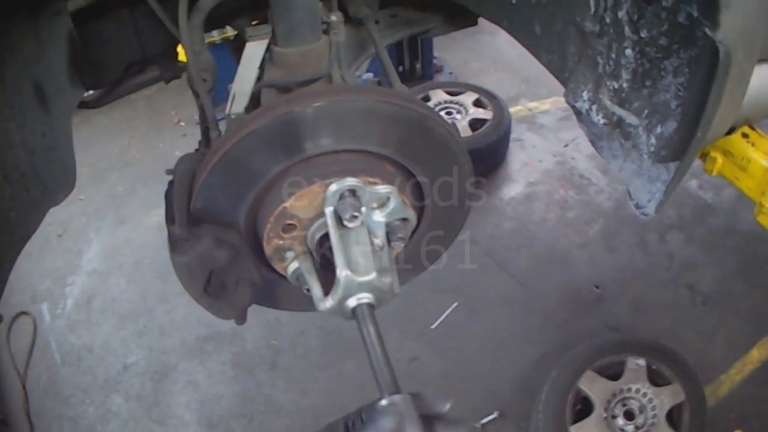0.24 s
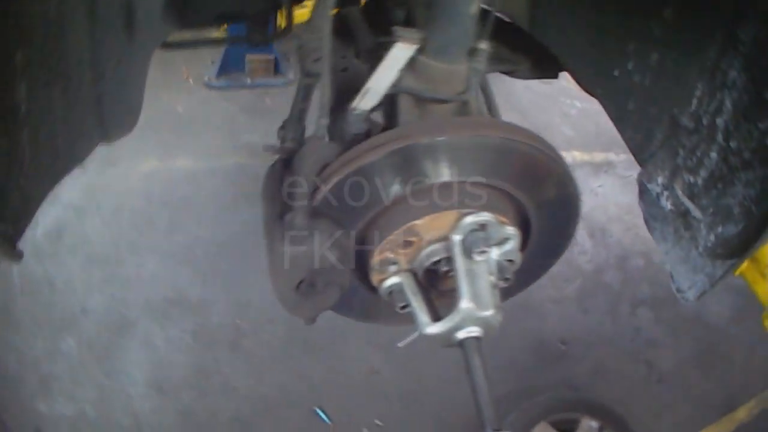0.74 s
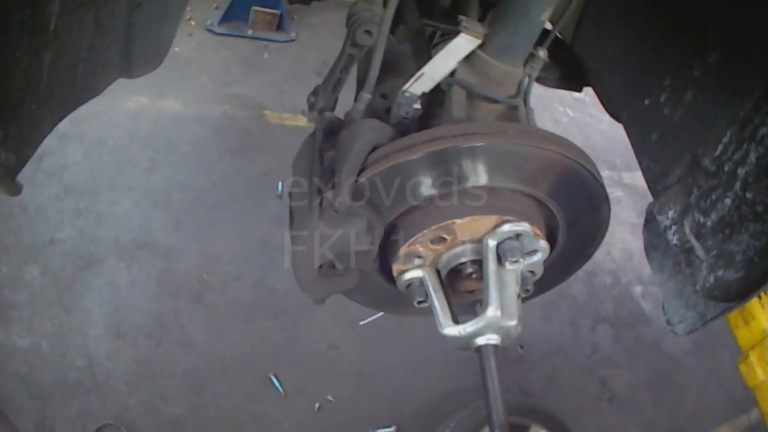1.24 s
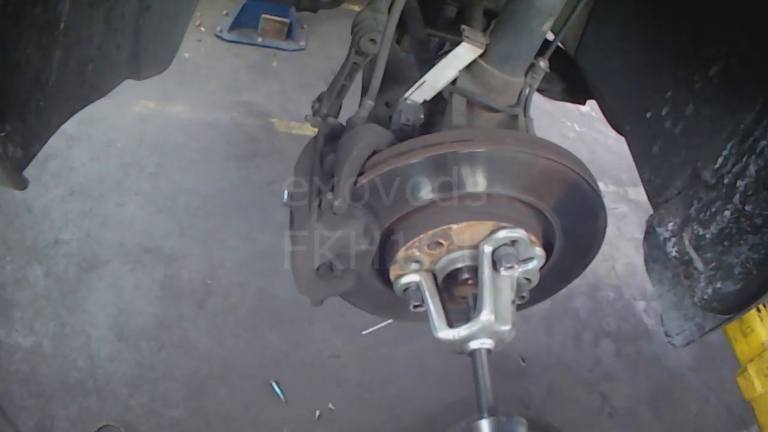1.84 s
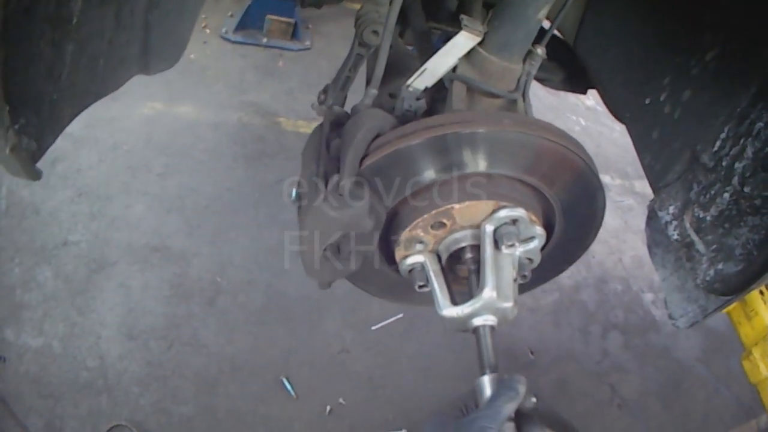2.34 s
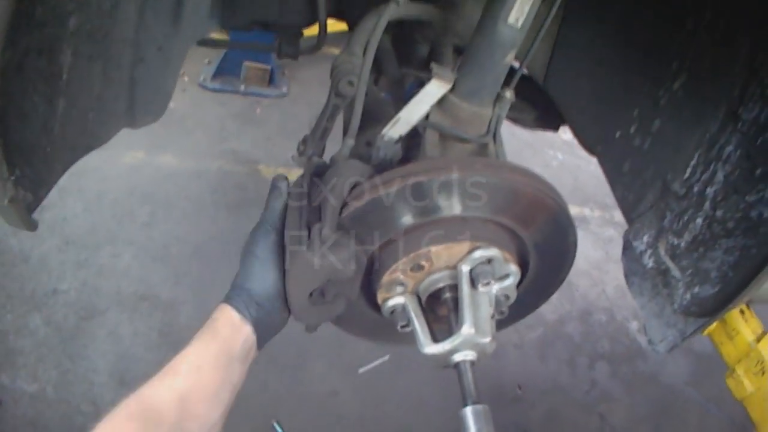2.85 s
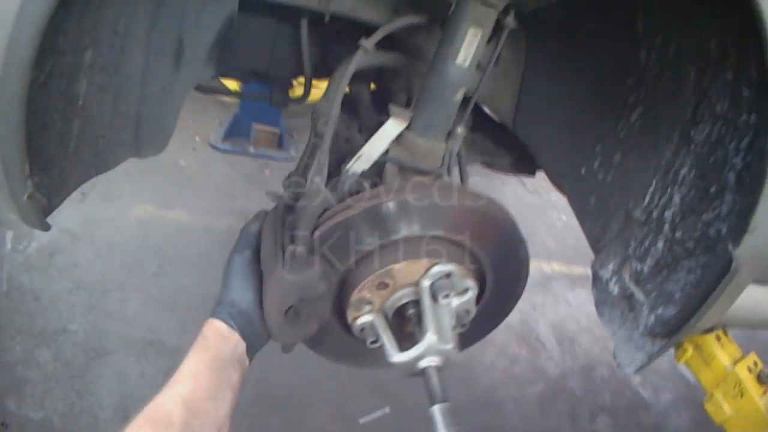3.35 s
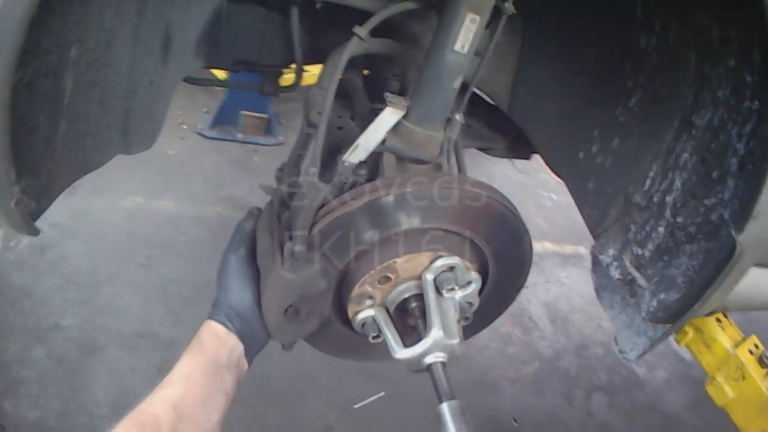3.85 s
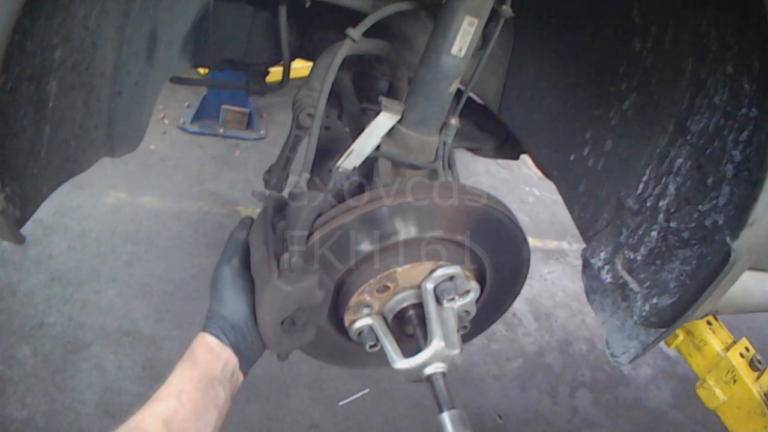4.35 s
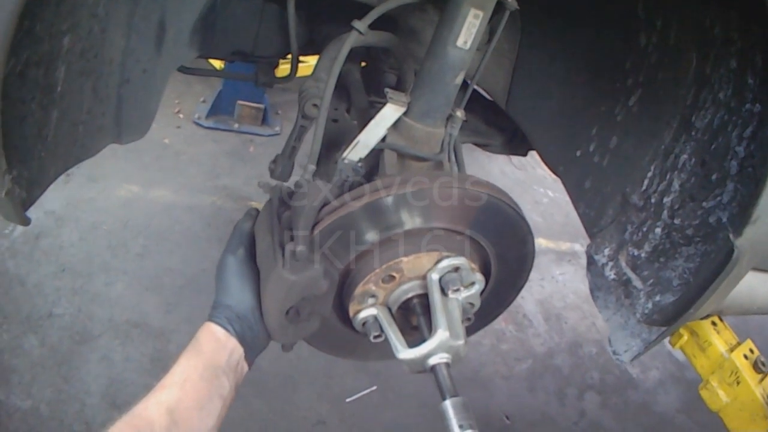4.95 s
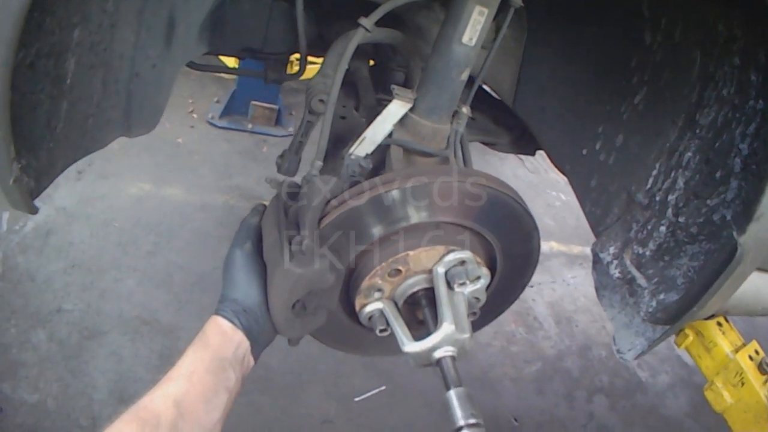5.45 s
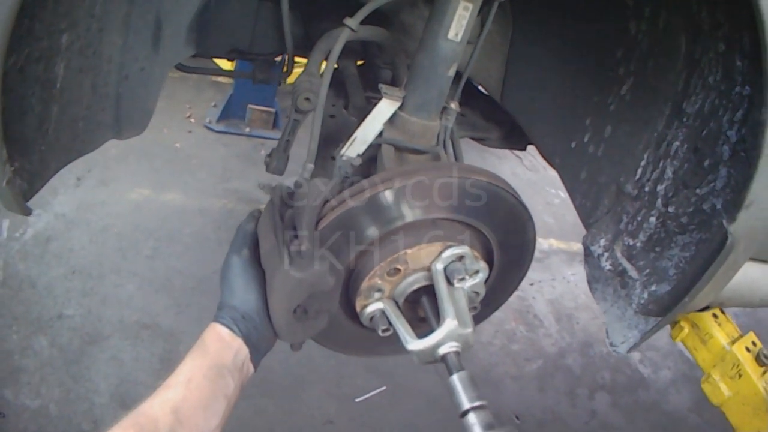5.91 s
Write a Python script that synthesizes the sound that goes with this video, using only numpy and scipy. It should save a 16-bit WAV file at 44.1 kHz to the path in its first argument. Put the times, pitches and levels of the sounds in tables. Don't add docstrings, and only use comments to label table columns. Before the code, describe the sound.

A close pneumatic wrench on a car hub: first a fading pressure thump and deep rumble, then four quick trigger blips, each a nasal whine with rattling socket clicks and puffs of air. About a second of quiet shop noise follows. A long, dense metallic hammering with rasping exhaust comes next, quickening at the end before the rotor races free. Short room echo surrounds it.

```python
import sys
import numpy as np
from scipy import signal
from scipy.fft import rfft, irfft, next_fast_len
from scipy.io import wavfile
from scipy.ndimage import uniform_filter1d

SR = 44100
rng = np.random.default_rng(int(sys.argv[2]) if len(sys.argv) > 2 else 0)


def log_audio(samples):
    frames = np.atleast_2d(samples).T
    limited = np.clip(frames, -1, 1)
    pcm = np.round(limited * 32767).astype(np.int16)
    wavfile.write(sys.argv[1], SR, pcm)


def undo_db(level):
    steps = np.asarray(level, float) / 20
    return 10 ** steps


N = 272538
TOP_HZ = 12780


def unit(x):
    return x / np.sqrt(np.mean(x ** 2) + 1e-20)


def along(points, hz):
    f, v = np.transpose(points)
    return np.interp(np.log(hz + 1), np.log(f + 1), v)


def curves(rows):
    s, *columns = np.transpose(rows)
    return [np.interp(np.arange(N) / SR, s, column) for column in columns]


def filtered(x, response):
    size = next_fast_len(len(x) + SR // 2)
    return irfft(rfft(x, size) * response(np.fft.rfftfreq(size, 1 / SR)), size)[:len(x)]


def resonate(x, modes):
    def gain(f):
        total = 0
        for k, (centre, width, db) in enumerate(modes):
            damping = 1j * f * width
            total = total + (-1) ** k * undo_db(db) * damping / (centre * centre - f * f + damping)
        return total

    power = np.mean(np.abs(gain(np.linspace(0, SR / 2, 2000))) ** 2)
    return filtered(x, gain) / np.sqrt(power)


def coloured(spectrum, size):
    white = rng.standard_normal(size + 2 * SR)
    return filtered(white, lambda hz: undo_db(along(spectrum, hz)))[SR:-SR] * np.sqrt(SR / 2)


def squeeze(x, top):
    return x / (1 + np.abs(x / top) ** 3) ** (1 / 3)


# (frequency [Hz], density [dB per Hz])
RUMBLE_SPECTRUM = [(1, -32), (3, -15.5), (7, -35), (14, -32), (28, -39.5), (100, -50), (400, -63),
                   (1000, -72.5), (4000, -86.5), (10000, -99), (14300, -104), (15200, -125)]
# (size, duration [s])
PRESSURE_SURGE = (.4, .03)


def rumble_pair():
    lead = 22
    rumble = coloured(RUMBLE_SPECTRUM, N + lead)
    swell = uniform_filter1d(rumble, SR // 40)
    rumble += squeeze(swell, top=.42) - swell
    size, duration = PRESSURE_SURGE
    rumble += size * np.exp(-(np.arange(N + lead) / SR / duration) ** 2)
    return np.array([rumble[lead:], rumble[:N]])


# (frequency [Hz], density [dB per Hz])
SHOP_SPECTRUM = [(200, -69), (700, -74), (1500, -82.5), (2800, -89), (3800, -93.5), (5500, -99),
                 (7000, -102), (9000, -106), (12000, -109), (14500, -114), (15400, -125)]
# (time [s], level [dB])
SHOP_DRIFT = [
    (0, 0.5),
    (1.1, 1.5),
    (2.6, 1.5),
    (3.7, 1),
]


def shop_air():
    return undo_db(curves(SHOP_DRIFT)[0]) * coloured(SHOP_SPECTRUM, N)


# (frequency [Hz], t60 [s])
GARAGE_T60 = [(500, 0.74), (2000, 0.49), (5000, 0.36), (11000, 0.29)]


def garage(x):
    out, step = np.zeros(N + 2 * SR), SR // 4
    for start in range(0, N, step):
        hz, t, z = signal.stft(rng.standard_normal(SR // 2), SR, nperseg=256)
        decay = undo_db(-60 * t / along(GARAGE_T60, hz)[:, None])
        tail = signal.istft(z * decay, SR, nperseg=256)[1]
        echo = signal.fftconvolve(x[start:start + step], tail / np.linalg.norm(tail))
        out[start + 400:][:len(echo)] += echo
    return out[:N]


# (pressed [s], released [s], vane rate aimed at on release [Hz], air [dB], whine fade after release [dB/s])
PULLS = [
    (1.211, 1.298, 445, -32.5, 24),
    (1.507, 1.572, 430, -33.5, 47),
    (1.954, 2.038, 469.8, -32.5, 49),
    (2.342, 2.452, 539.6, -34, 500),
    (3.725, 6.115, 548, -34, 11),
]
# (time [s], vane rate [Hz])
LONG_RUN_SPEED = [
    (3.725, 170),
    (3.75, 200),
    (4.1, 230),
    (5.4, 280),
    (5.7, 280),
    (5.8, 312),
    (6.0, 490),
    (6.07, 528),
    (6.115, 548),
]
# (vane rate [Hz], level [dB])
WHINE_BY_SPEED = [(150, -72), (230, -39.5), (280, -34.5), (320, -29), (400, -27.5), (530, -24)]
# (time [s], level [dB])
AIR_SPITS = [
    (1.191, -37),
    (1.633, -28),
    (1.768, -48),
    (2.1, -33),
    (2.238, -46),
    (3.738, -36),
]


def trigger():
    start_hz, free_hz, rest_hz, coast_s = 205.05, 490, 110, .135
    t = np.arange(N) / SR
    table = np.array(PULLS)
    pull = (np.searchsorted(table[:, 0], t) - 1).clip(0)
    on, off, top_hz, air_db, fade = table[pull].T
    driven = np.minimum(t, off)
    progress = ((driven - on) / (off - on)).clip(0)
    spin = np.minimum(start_hz + (top_hz - start_hz) * progress, free_hz)
    short = pull < len(table) - 1
    spin = np.where(short, spin, np.interp(driven, *np.transpose(LONG_RUN_SPEED)))
    after = t - driven
    hz = uniform_filter1d(rest_hz + (spin - rest_hz) * np.exp(-after / coast_s), size=500)
    whine_db = along(WHINE_BY_SPEED, hz) - fade * after - 99 * (t < on)
    whine_db = whine_db - short * (after == 0)
    hiss, roar = np.zeros((2, N))
    for pressed, released, _, db, brake in PULLS:
        held = np.round(t.clip(pressed + .02, released) * SR).astype(int)
        octaves = np.log2(hz[held] / 320)
        shut_db = 1800 * (pressed - t).clip(0)
        emptying = (t - released).clip(0)
        hiss += undo_db(db + 5 * octaves - shut_db - (454 + brake) * emptying)
        roar += undo_db(db + 9.5 - 2.5 * octaves - shut_db - (68 + 0.45 * brake) * emptying)
    for s, db in AIR_SPITS:
        hiss += undo_db(db) * np.exp(-((t - s) / 0.0029) ** 2)
    return hz, uniform_filter1d(whine_db, size=600), hiss, roar


# (time [s], share of speed)
ROTOR_STALL = [
    (3.6, .008),
    (3.7, .045),
    (5.5, .04),
    (5.7, .012),
    (6.0, .008),
]
# (frequency [Hz], level [dB])
VANE_OVERTONES = [(150, -10), (250, -3), (320, 2), (520, 1), (750, -1), (1050, -4), (1300, 2), (1600, 4),
                  (1900, -3), (2300, -15), (3000, -30)]
# (frequency [Hz], width [Hz], level [dB])
EXHAUST_MODES = [(3450, 760, -3.5), (3940, 140, 4.5), (4560, 490, -6), (5530, 630, -0.5),
                 (8050, 32000, -10.5), (11800, 5100, -23.5)]
# (frequency [Hz], width [Hz], level [dB])
HOUSING_MODES = [(460, 346, 4.5), (1180, 350, 5.5), (1630, 675, 4), (2344, 340, -7)]


def motor():
    hz, whine_db, hiss_gain, roar_gain = trigger()
    wander = unit(uniform_filter1d(rng.standard_normal(N), 900))
    turn = 2 * np.pi * np.cumsum(hz * (1 + curves(ROTOR_STALL)[0] * wander)) / SR
    speeding = uniform_filter1d(np.gradient(hz) * SR / 1000, 600).clip(-1, 3)
    whine = np.zeros(N)
    for k in range(1, 11):
        flutter_db = (2.5 if k > 1 else 1) * unit(uniform_filter1d(rng.standard_normal(N), 700))
        sharp_db = -1.8 * speeding * (k > 2)
        level_db = along(VANE_OVERTONES, k * hz) + flutter_db + sharp_db
        whine += undo_db(level_db) * np.sin(k * turn + k * k)
    puff = unit(2.6 + np.cos(turn))
    hiss = undo_db(6.5) * hiss_gain * resonate(puff * rng.standard_normal(N), EXHAUST_MODES)
    roar = undo_db(-5.5) * roar_gain * resonate(puff * rng.standard_normal(N), HOUSING_MODES)
    return undo_db(whine_db - 2.5) * whine, hiss + roar


# (time [s], blow rate [blows per s])
LOADED_RATE = [
    (3.741, 25.16),
    (4.069, 30.33),
    (4.072, 35.45),
    (4.343, 29.79),
    (4.432, 34.98),
    (5.022, 34.56),
    (5.628, 40.36),
    (5.778, 48.26),
    (5.9, 38.3),
]


def loaded_blows():
    first, last = LOADED_RATE[0][0], LOADED_RATE[-1][0]
    t = np.arange(round(first * SR), round(last * SR)) / SR
    struck = np.cumsum(np.interp(t, *np.transpose(LOADED_RATE))) / SR
    times = np.interp(np.arange(int(struck[-1]) + 1), struck, t)
    late, nose, case = rng.standard_normal((len(times), 3)).T
    db = -9 + 2.1 * nose
    return list(zip(times + .001 * late, db, -17 + 1.13 * case - db))


# (time [s], peak [dB], body knock minus peak [dB], socket ring [dB])
LOOSE_BLOWS = [(1.1882, -22, -5, -10), (1.212, -19, -17, -18), (1.2337, -5, -15, -17),
               (1.2637, 0, -11.5, -18), (1.2959, -5, -6, -5), (1.3697, -12, -7, -16), (1.504, -32, 4, -23),
               (1.5828, -7, -9, -16), (1.6324, -10.5, -5, -10), (1.6889, -13, -5.5, 13),
               (1.7454, -34, -12, -9), (1.955, -17, -28, -12), (2.0025, -5.5, -9.5, 8),
               (2.0444, -6, -7.5, 7.5), (2.0778, -9, -4.5, 6), (2.107, -4.5, -14.5, 3.5),
               (2.1549, -15.5, -6.5, 9), (2.347, -44, 14, -17), (2.4033, -5, -7.5, 0),
               (2.4286, -3.5, -9, 3), (2.4521, -14.5, -2.5, 7), (3.7047, -20.5, -9.5, 1),
               (3.7249, -16, -27, -9)]
# (time [s], peak [dB], body knock minus peak [dB])
FREEING_BLOWS = [
    (5.9263, -6.5, -10),
    (5.9572, -9, -9),
    (5.9908, -7.5, -18),
    (6.0351, -6, -8),
    (6.08, -7.5, -7),
    (6.1128, -4, -12),
    (6.1606, -11.5, -4),
]
# (frequency [Hz], width [Hz], level [dB])
ANVIL_MODES = [(3420, 570, -3.5), (4047, 380, 2), (5040, 630, -0.5), (5310, 600, -0.5), (8300, 7200, -15.5),
               (12140, 4800, -13.5)]
# (frequency [Hz], width [Hz], level [dB])
CASE_MODES = [(1274, 572, -2), (1565, 400, 1.5), (1770, 143, -1), (2130, 400, -11.5)]
# (frequency [Hz], level [dB], t60 [s])
SOCKET_PARTIALS = [(3900, 0, .032), (3470, -12, .03), (4400, -17, .025), (4830, -18, .03),
                   (8900, -22, .025), (11550, -28, .025)]


def hammer():
    t = np.arange(SR // 8) / SR
    rise = t / 0.0033
    contact = (rise * np.exp(1 - rise)) ** 1.2
    case_load = np.exp(-((t - .004) / 0.0043) ** 2)
    nose, body, ring = np.zeros((3, N + len(t)))
    rows = [tuple(row) for row in LOOSE_BLOWS]
    rows += [(*row, -13) for row in loaded_blows() + list(FREEING_BLOWS)]
    for s, db, knock_db, ring_db in rows:
        start = round((s - .001) * SR)
        at = slice(start, start + len(t))
        anvil_grit, case_grit = np.sign(rng.standard_normal((2, len(t))))
        nose[at] += undo_db(db - 14.0) * contact * anvil_grit
        body[at] += undo_db(db + knock_db - 2.5) * case_load * case_grit
        for hz, level, t60 in SOCKET_PARTIALS:
            size_db, shift = rng.standard_normal(2) * (3, .008)
            decay = undo_db(db + ring_db + level + size_db - 60 * t / t60)
            onset = 1 - np.exp(-t / 0.008)
            ring[at] += decay * onset * np.sin(2 * np.pi * hz * (1 + shift) * t)
    return resonate(nose[:N], ANVIL_MODES) + resonate(body[:N], CASE_MODES), ring[:N]


# (frequency [Hz], width [Hz], level [dB])
SEATED_MODES = [(3404, 290, 0)]


def seated_puller(x):
    pressed = np.arange(N) / SR > PULLS[-1][0]
    return undo_db(-18.5) * resonate(pressed * x, SEATED_MODES)


def scene():
    whine, air = motor()
    blows, ring = hammer()
    blows = blows + seated_puller(air + blows)
    room = garage(air + blows + undo_db(-8) * whine + undo_db(-14) * ring)
    tool = squeeze(whine + air + blows + ring + undo_db(-7) * room, top=.36)
    tool = filtered(tool, lambda hz: ((TOP_HZ - hz) / 150).clip(0, 1))
    return tool + shop_air() + rumble_pair()


def band_limit(x):
    return signal.sosfilt(signal.butter(12, 15140, fs=SR, output="sos"), x)


def record(dry):
    mix = dry - .0275
    return band_limit(mix)


dry = scene()
out = record(dry)
log_audio(out)
```